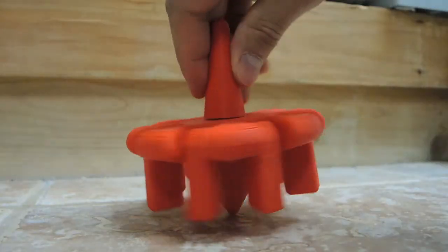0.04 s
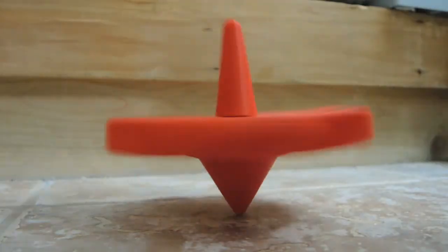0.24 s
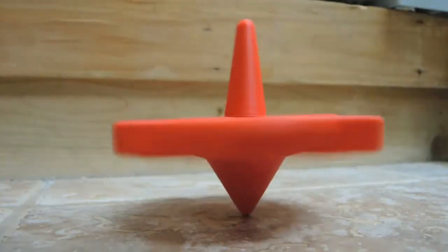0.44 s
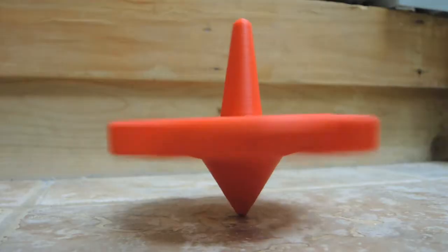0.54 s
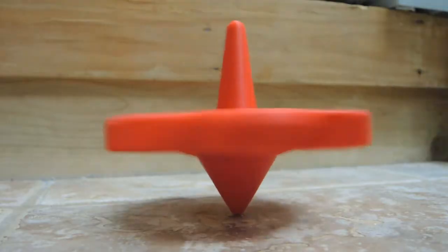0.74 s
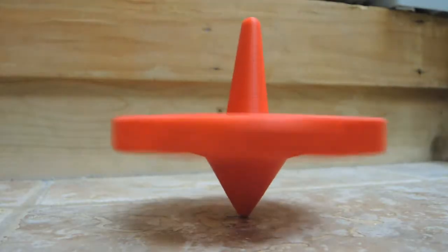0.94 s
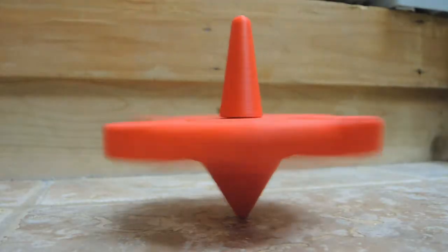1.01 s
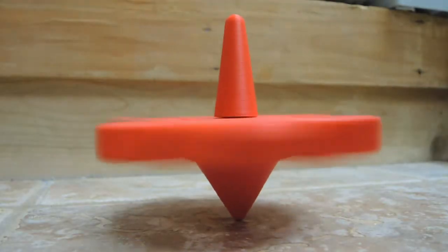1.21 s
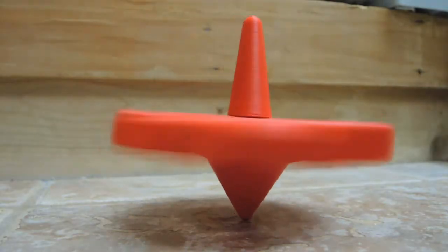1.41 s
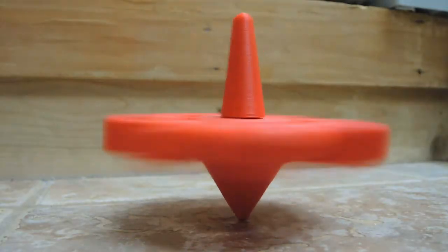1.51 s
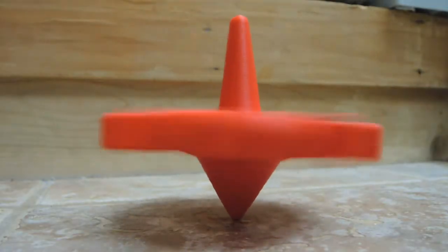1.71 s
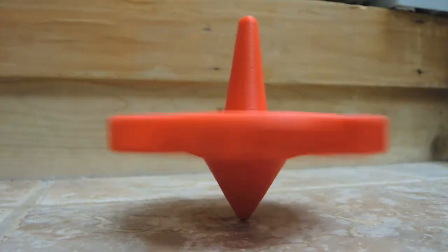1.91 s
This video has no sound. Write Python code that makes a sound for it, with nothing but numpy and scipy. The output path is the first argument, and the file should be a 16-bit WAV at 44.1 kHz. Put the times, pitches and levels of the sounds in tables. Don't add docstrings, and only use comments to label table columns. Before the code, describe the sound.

Plastic top clatters open from the fingers, lands on tile, then rubs and ticks while spinning

```python
import sys
import numpy as np
from scipy import signal
from scipy.fft import rfft, irfft
from scipy.io import wavfile
from scipy.ndimage import uniform_filter1d

SR = 44100
rng = np.random.default_rng(int(sys.argv[2]) if len(sys.argv) > 2 else 0)


def decibels_to_gain(level_db):
    exponent = np.asarray(level_db, float) / 20
    return 10 ** exponent


def wav_record(signal):
    frames = np.transpose(np.atleast_2d(signal))
    bounded = np.clip(frames, -1, 1)
    quanta = np.round(bounded * 32767).astype(np.int16)
    wavfile.write(sys.argv[1], SR, quanta)


N = 85995
T = np.arange(N) / SR

# (frequency [Hz], level per Hz [dB])
FLOOR_COLOUR = [(25, -11), (90, 4), (250, -3), (500, -7), (1000, -12), (3400, -12.5), (7300, -11.5),
                (14500, -14)]
# (frequency [Hz], left minus right [dB])
EAR_BALANCE = [(100, -0.5), (1000, -2.5), (2500, -0.5), (4500, -2), (8000, 2), (12000, 0.5)]
# (frequency [Hz], side scatter [dB])
SIDE_SCATTER = [(100, -12), (1000, -34.5), (2500, -12.5), (4500, -7), (8000, -8.5), (12000, -3)]
# (frequency [Hz], level [dB])
TOP_CUT = [(14120, 0), (14300, -20), (15000, -38)]
# (time [s], level [dB], pitch [Hz], fall [s])
THUDS = [(0.248, -54.5, 32, 0.013), (0.257, -65, 119, 0.011), (0.409, -60, 164, 0.01),
         (0.561, -58.5, 296, 0.0041), (0.743, -73, 47.5, .015), (0.936, -87, 181, 0.05),
         (1.029, -58, 330, 0.0061), (1.352, -66.5, 94, 0.025), (0.838, -72, 59.3, 0.018),
         (1.43, -64, 297, 0.015), (.935, -65, 171, 0.017), (1.172, -61, 710, 0.01),
         (1.172, -63, 890, 0.0088), (1.9, -60.5, 99.7, 0.0063)]
# (time [s], level [dB], pitch [Hz])
DRONE = [(0, -83.5, 540), (.45, -77.5, 550), (.8, -78.5, 548), (1.1, -77.5, 545), (1.19, -71, 525),
         (1.26, -76, 540), (1.33, -70.5, 552), (1.38, -78, 558), (1.44, -69, 550), (1.47, -84, 548),
         (1.56, -81, 546), (1.7, -88, 542), (1.8, -80, 545), (1.86, -87, 540), (1.95, -100, 540)]
# (time [s], level [dB], pitch [Hz], fall [s])
SLIPS = [(.035, -60.5, 7200, 0.011), (.047, -64, 7300, 0.0064), (.042, -65.5, 5100, .008),
         (.048, -63, 9800, .004), (.076, -66, 9800, .002), (.089, -55, 9500, 0.0018),
         (.102, -66.5, 10500, 0.0034), (.109, -58.5, 8700, .003), (.117, -61.5, 10500, 0.0024),
         (.138, -59, 7400, 0.0022), (.164, -55.5, 8500, 0.0042), (.186, -34, 9800, 0.0034),
         (.450, -50, 9500, 0.0017), (.466, -58, 8240, .002), (0.484, -59, 7500, 0.0019),
         (0.91, -42, 9100, 0.0033), (.508, -43, 8450, 0.0022)]
# (time [s], level [dB])
CREAKS = [
    (.001, -60),
    (0.023, -64),
    (0.076, -52.5),
    (0.0998, -53),
    (0.104, -65),
    (0.109, -53.5),
    (.116, -61),
    (0.135, -63),
    (.142, -63),
    (0.162, -57),
]
# (start [s], length [s], level [dB], rim share [dB])
RUBS = [(0.389, 0.099, -62, -2), (0.504, 0.094, -66.5, 0.5), (0.634, 0.071, -61.5, -1),
        (0.73, 0.09, -63.5, -2), (0.881, 0.069, -61, -1.5), (0.987, 0.074, -62.5, -3.5),
        (1.129, 0.046, -58, -2.5), (1.214, 0.036, -62.5, -1.5), (1.266, 0.06, -75, 4.5),
        (1.353, 0.089, -69.5, -6.5), (1.486, 0.1, -69.5, -0.5), (1.649, 0.095, -67.5, -3),
        (1.763, 0.042, -72, 1), (1.856, 0.051, -72.5, 2.5), (1.918, .06, -70, -4.5)]
# (time [s], peak level [dB], fall [s])
TICKS = [(0.485, -64, 0.0017), (0.5074, -62, 0.0012), (0.56, -46, 0.0065), (0.68, -40.5, 0.0018),
         (0.899, -45.5, 0.0042), (0.9113, -39.5, 0.0029), (0.925, -65, 0.0031), (0.937, -47, 0.0028),
         (0.99, -45, 0.0029), (1.0257, -41.5, 0.0068), (1.071, -53, 0.0011), (1.1354, -41, 0.0016),
         (1.1637, -46, 0.0035), (1.238, -56, 0.0034), (1.303, -51, 0.0035), (1.3933, -44, 0.0099),
         (1.554, -46, .004), (1.669, -47, 0.011), (1.692, -42.5, 0.01), (1.8419, -48, 0.0075),
         (1.923, -52, 0.0085)]
# (time [s], peak level [dB])
BUMPS = [(.552, -56), (.657, -51), (.682, -39), (.695, -50), (.745, -52), (.910, -30), (.918, -36),
         (.9245, -35), (.930, -38), (.9355, -34.5), (.9405, -28), (.9455, -43), (.949, -42), (.955, -43),
         (1.1352, -48), (1.142, -50), (1.165, -43), (1.171, -39.5), (1.178, -49), (1.24, -57), (1.421, -46),
         (1.433, -56)]
# (time [s], level [dB])
LANDINGS = [
    (.3518, -9),
    (.3762, -21),
]
# (frequency [Hz], width [Hz], level [dB])
TIP_MODES = [(5388, 119, 5.5), (7200, 220, 2), (8380, 380, -1.5), (9140, 240, -13), (9540, 150, -5),
             (10830, 500, -6.5), (12160, 640, -40)]
RIM_MODES = [(3095, 55, 4), (3420, 170, -1)]
TILE_MODES = [(177.7, 140, -1), (330, 106, 4), (463.4, 190, 1.5), (804, 750, -3.5), (1236, 434, -4),
              (1960, 2200, -19.5)]
KNOCK_MODES = [(720, 800, -9), (330, 300, -8)]
LANDING_MODES = [(230, 220, -7), (550, 250, 0.5), (1274, 100, 9), (3190, 68, 16.5)]
# (peak time [s], level [dB], rise [s], fall [s], treble [dB])
CLATTER = [(0.185, -31, 0.00047, 0.003, -13), (0.194, -45, 0.0034, .004, -14),
           (0.199, -28.5, 0.004, 0.0032, -10.5), (0.205, -43.5, .002, 0.0043, 1.5),
           (0.223, -29, 0.0037, 0.022, -28), (0.241, -26.5, 0.008, 0.0084, 3),
           (0.251, -24, 0.0046, 0.0071, 1), (0.278, -25.5, 0.0053, 0.0069, -4.5),
           (0.289, -23.5, 0.0032, 0.011, -7.5), (.303, -32.5, 0.0031, .004, -5.5),
           (0.311, -34.5, 0.013, 0.0086, 0), (0.317, -15, 0.0046, 0.0014, -8),
           (0.338, -36.5, 0.011, 0.023, -4), (0.3528, -27.5, 0.00052, 0.0057, 4),
           (0.377, -34, 0.0021, 0.0011, 7), (0.385, -56, 0.0043, 0.013, 8),
           (0.408, -53.5, 0.011, 0.036, -5)]
# (frequency [Hz], width [Hz], level [dB])
ARM_MODES = [(1180, 130, -7), (1450, 140, -6), (1815, 110, -3), (2190, 110, -7), (2325, 95, 3.5),
             (2530, 110, -5), (2760, 100, -7), (3135, 80, 0), (3620, 90, -11), (4620, 160, -7),
             (5760, 200, -12), (7150, 300, -7), (7650, 350, -9), (8350, 400, -5)]
# (frequency [Hz], level per Hz [dB])
ARM_WASH = [(150, -29.5), (800, -12), (1300, -15.5), (2360, -3.5), (4200, -11.5), (6300, -10), (8500, -1.5),
            (14500, -17)]
# (time [s], body level [dB])
WEIGHT = [
    (.18, -14.5),
    (.22, -2),
    (.25, -5.5),
    (.3, -10),
    (.34, -4.5),
    (.355, 1),
    (.39, 14.5),
    (.45, 14),
    (.5, 6),
]

GRAIN_DB = 2.2
TICK_RISE_S = 0.0007


def rms(x):
    return np.sqrt(np.mean(x ** 2))


def unit(x):
    return x / rms(x)


def on_log(table, hz):
    table = np.array(table, float)
    return np.interp(np.log(hz + 1), np.log(table[:, 0]), table[:, 1])


def colour(x, table, sign=1):
    gain = decibels_to_gain(sign * on_log(table, np.fft.rfftfreq(N, 1 / SR)))
    return irfft(rfft(x) * gain, N)


def ring(x, modes):
    total = 0
    for k, (hz, width, db) in enumerate(modes):
        b, a = signal.iirpeak(hz, hz / width, SR)
        total = total + (-1) ** k * decibels_to_gain(db) * signal.lfilter(b, a, x)
    return total


def swell(at, rise, fall):
    return np.exp(np.where(T < at, (T - at) / rise, (at - T) / fall))


def grit(spread_db):
    return unit(rng.standard_normal(N) * decibels_to_gain(spread_db * rng.exponential(size=N)))


def flicker(rate, db):
    k = int(SR / rate)
    wander = uniform_filter1d(uniform_filter1d(rng.standard_normal(N), k), k)
    return decibels_to_gain(db * unit(wander))


def clicks(rows):
    x = np.zeros(N)
    for s, db in rows:
        x[int(s * SR)] += decibels_to_gain(db)
    return x


def soft(x):
    return signal.lfilter(np.hanning(7), 1, x)


def floor():
    mid, side = (unit(colour(rng.standard_normal(N), FLOOR_COLOUR)) for _ in range(2))
    side = colour(side, [(30, -2.5), (100, -6.5), (300, -11.5), (1500, -2.5), (8000, -4.5)])
    both = mid + side * np.array([[1], [-1]])
    low_pass = signal.butter(1, 300, fs=SR, output="sos")
    rumble = signal.sosfilt(low_pass, both) * decibels_to_gain(np.array([[-2.0], [2.0]]))
    hum = decibels_to_gain(-76) * flicker(3, 0.3) * np.sin(2 * np.pi * 240 * T)
    return decibels_to_gain(-72.5) * (both + rumble * (flicker(25, 1.4) - 1)) + hum


def tail(t60, delay):
    t = np.arange(SR // 2) / SR
    h = rng.standard_normal((2, len(t))) * decibels_to_gain(-60 * t / t60) * (t > delay)
    return h / np.sqrt(np.sum(h ** 2, axis=1, keepdims=True))


def thuds():
    total = 0
    for s, db, hz, fall in THUDS:
        wobble = np.cos(2 * np.pi * hz * (T - s))
        total = total + decibels_to_gain(db) * swell(s, 0.45 * fall, fall) * wobble
    return total


def drone():
    s, db, hz = np.array(DRONE).T
    wobble_hz = 24
    pitch = np.interp(T, s, hz) + wobble_hz * unit(np.log(flicker(40, 1.0)))
    phase = 2 * np.pi * np.cumsum(pitch) / SR
    air = unit(ring(rng.standard_normal(N), [(550, 110, 0)]))
    return (np.sin(phase) * flicker(30, 4.4) + air) * decibels_to_gain(np.interp(T, s, db))


def skin():
    grain = grit(GRAIN_DB)
    total = 0
    for s, db, hz, fall in SLIPS:
        push = grain * decibels_to_gain(db + 6.5) * swell(s, 0.23 * fall, fall)
        total = total + ring(push, [(hz, 0.076 * hz, 0)])
    return total


def creaks():
    push = grit(GRAIN_DB) * sum(decibels_to_gain(db) * swell(s, TICK_RISE_S, 0.0042) for s, db in CREAKS)
    slips = decibels_to_gain(18.0) * ring(push, [(2300, 75, 0), (1700, 500, -25), (3400, 400, -26)])
    hold = decibels_to_gain(-61.5) * swell(0.12, 0.061, 0.044)
    let_go = decibels_to_gain(-52) * swell(0.168, 0.0049, 0.013)
    rustle = grit(GRAIN_DB) * flicker(60, 3) * (hold + let_go)
    return slips + ring(rustle, [(600, 370, 5), (1940, 890, -2), (2990, 700, -4.5), (9000, 3400, -10.5)])


def edge(s):
    rub_edge_s = 0.024
    return 1 / (1 + np.exp(np.clip(-4 * (T - s) / rub_edge_s, -50, 50)))


def shimmer(force, modes, rate):
    return sum(flicker(rate, 3.3) * ring(force, [mode]) for mode in modes)


def tip():
    rubs = [decibels_to_gain(db) * edge(s) * (1 - edge(s + length)) for s, length, db, _ in RUBS]
    touch = sum(rubs) * flicker(73, 2)
    rim_share = sum(r * decibels_to_gain(row[3]) for r, row in zip(rubs, RUBS)) / (sum(rubs) + 1e-12)
    tick_env = sum(decibels_to_gain(db) * swell(s + 0.00059, TICK_RISE_S, fall) for s, db, fall in TICKS)
    catch = grit(GRAIN_DB) * tick_env
    force = grit(GRAIN_DB) * decibels_to_gain(9) * touch + decibels_to_gain(-5.0) * catch
    scrape = decibels_to_gain(-13) * force * flicker(150, 5.16) + decibels_to_gain(-10) * catch
    hiss = colour(scrape, [(3500, -21), (6000, 0.5), (8500, 0.5), (14000, -7.5)])

    knock = decibels_to_gain(12) * clicks(BUMPS)
    high = shimmer(force, TIP_MODES, 190)
    rim = shimmer(force * rim_share, RIM_MODES, 160) + decibels_to_gain(8) * ring(knock, RIM_MODES[:1])
    chatter_env = signal.lfilter([0.025], [1, -np.exp(-1 / (0.005 * SR))], knock)
    chatter = rng.standard_normal(N) * chatter_env
    drag = decibels_to_gain(9.5) * grit(GRAIN_DB) * touch
    tile = ring(soft(knock), KNOCK_MODES) + ring(soft(decibels_to_gain(-9) * knock + chatter) + drag, TILE_MODES)
    return high + rim + hiss + tile + ring(soft(clicks(LANDINGS)), LANDING_MODES)


def arms():
    release_s, lock_s, lock_fall_s = 0.1853, 0.385, 0.012
    grain = grit(GRAIN_DB) * flicker(250, 1.7)
    treble = signal.sosfiltfilt(signal.butter(2, 3900, "high", fs=SR, output="sos"), grain)
    env = [decibels_to_gain(db) * swell(s, rise, fall) * (T > release_s) for s, db, rise, fall, _ in CLATTER]
    treble_env = sum(e * decibels_to_gain(row[4]) for e, row in zip(env, CLATTER))
    force = (grain - treble) * sum(env) + treble * treble_env

    swung = 0
    for k, mode in enumerate(ARM_MODES):
        swung = swung + (-1) ** k * flicker(70, 3) * ring(force, [mode])
    ringing = decibels_to_gain(-3) * swung * swell(lock_s, np.inf, lock_fall_s) / rms(ring(grain, ARM_MODES))
    wash = colour(force, ARM_WASH) / rms(colour(grain, ARM_WASH))
    tone = ringing + wash
    body = signal.sosfiltfilt(signal.butter(2, 1600, fs=SR, output="sos"), tone)
    body_gain = decibels_to_gain(np.interp(T, *np.array(WEIGHT).T))
    return decibels_to_gain(-0.5) * (tone + body * (body_gain - 1))


def scene():
    near = arms() + creaks() + skin() + tip() + drone()

    def spread(h):
        return signal.fftconvolve(near[None], h, axes=1)[:, :N]

    scatter = spread(tail(0.012, 0.0))
    turn = 2 * np.pi * 45 * T
    side = colour(scatter[0] * np.cos(turn) + scatter[1] * np.sin(turn), SIDE_SCATTER)
    room = signal.lfilter([0.5], [1, -0.5], spread(tail(0.13, 0.01)))
    panned_thuds = thuds() * decibels_to_gain(3.5 * np.array([[-1], [1]]))
    wet = near + side * np.array([[1], [-1]]) + decibels_to_gain(-13) * room + panned_thuds
    left, right = colour(wet[0], EAR_BALANCE, 0.22), colour(wet[1], EAR_BALANCE, -1.53)
    return np.array([left, right]) + floor()


def band_limit(x):
    return signal.sosfilt(signal.butter(12, 15090, fs=SR, output="sos"), x)


def record(dry):
    x = np.tanh(7.5 * dry) / 7.5
    x = np.array([colour(side, TOP_CUT) for side in x])
    return band_limit(x)


dry = scene()
out = record(dry)
wav_record(out)
```